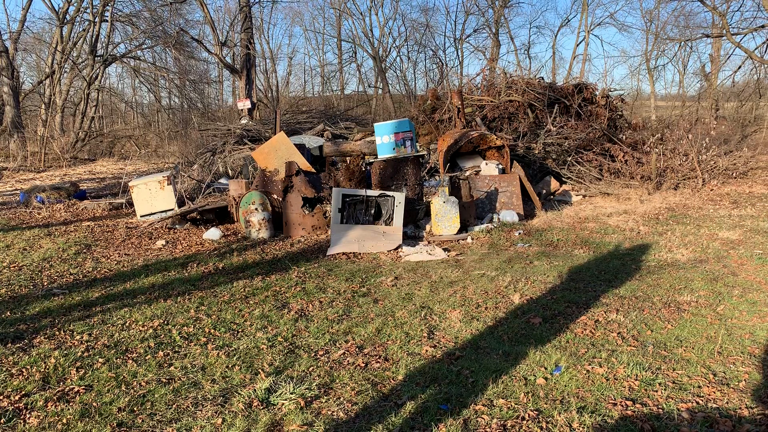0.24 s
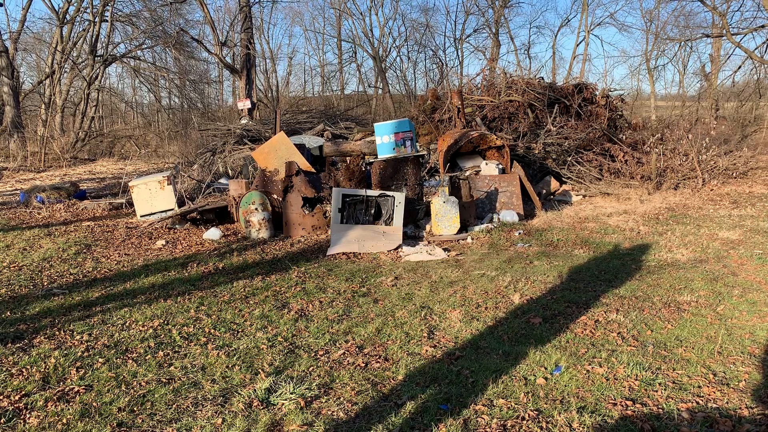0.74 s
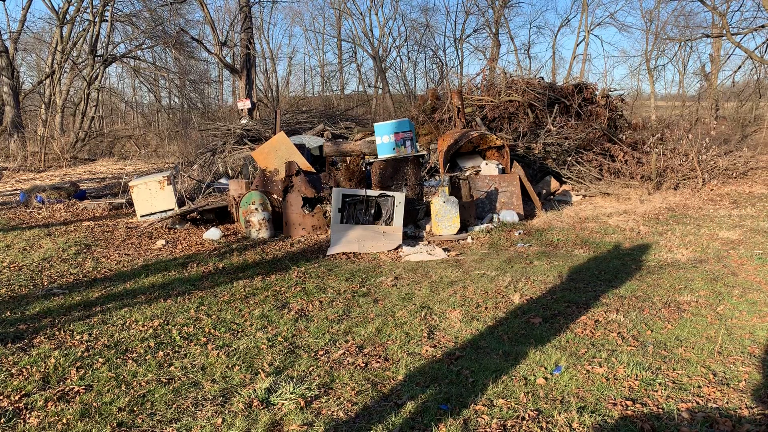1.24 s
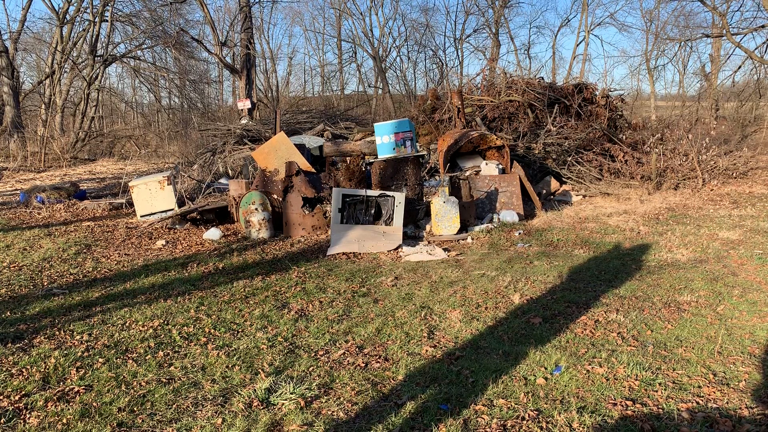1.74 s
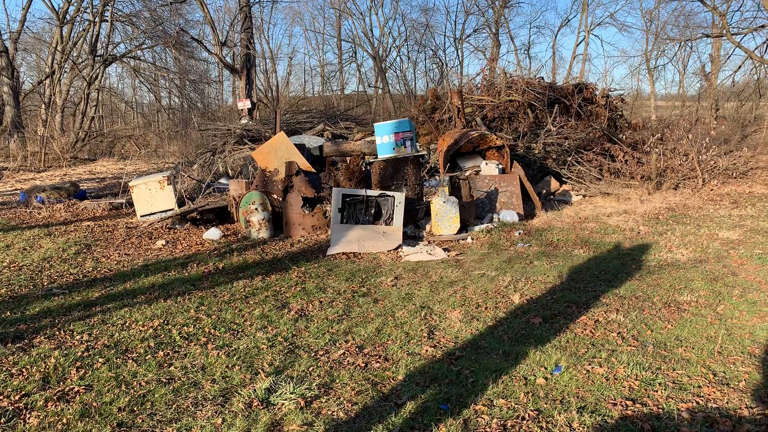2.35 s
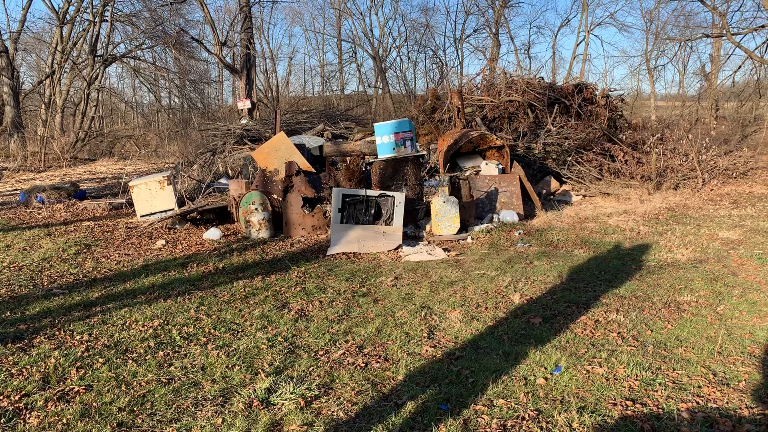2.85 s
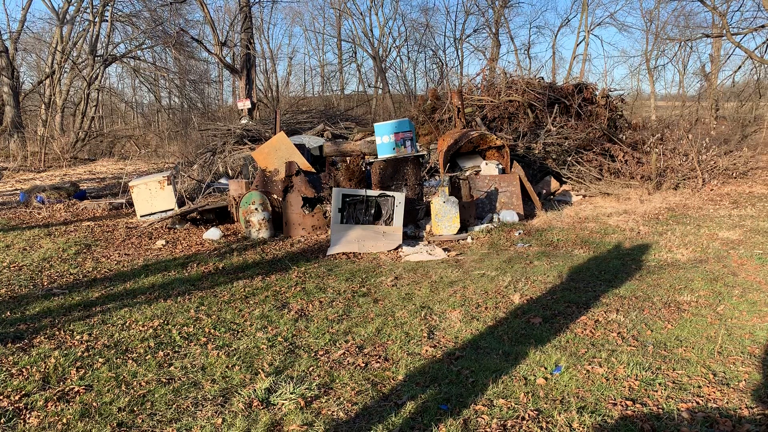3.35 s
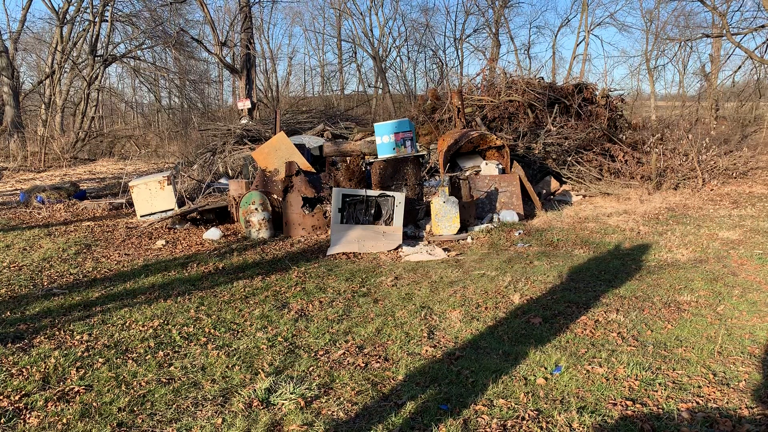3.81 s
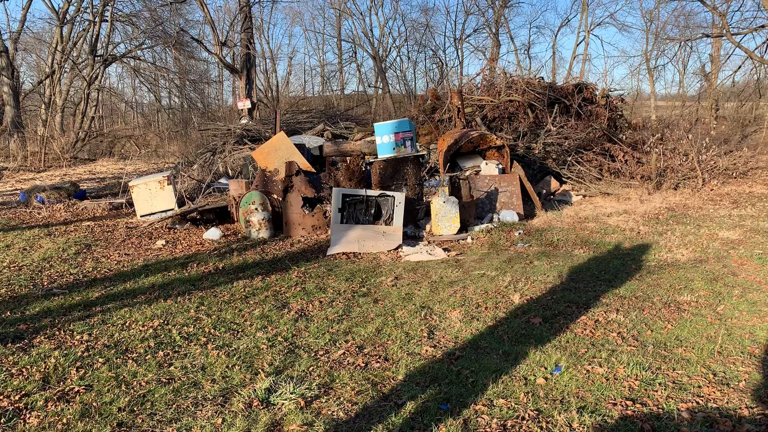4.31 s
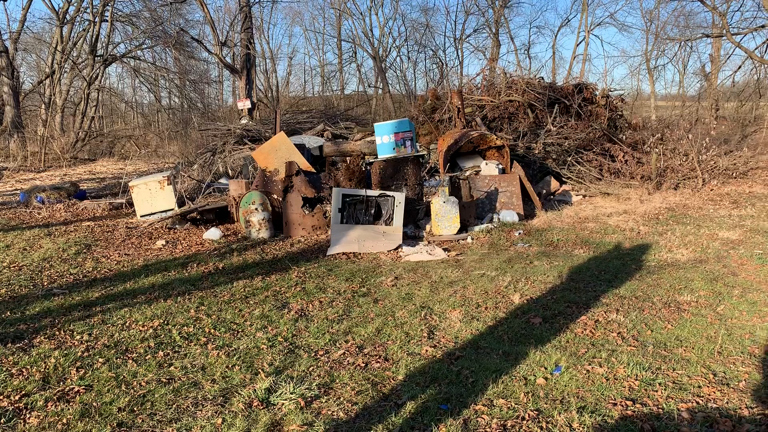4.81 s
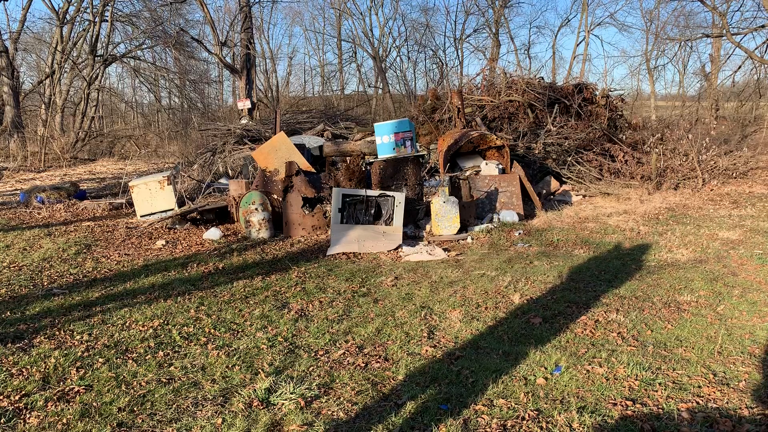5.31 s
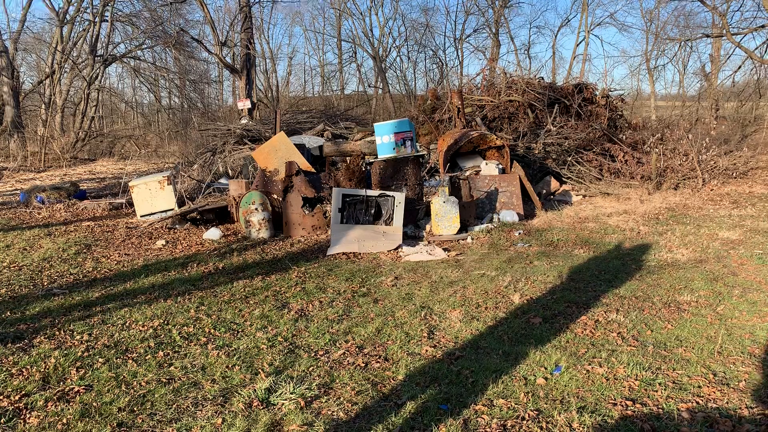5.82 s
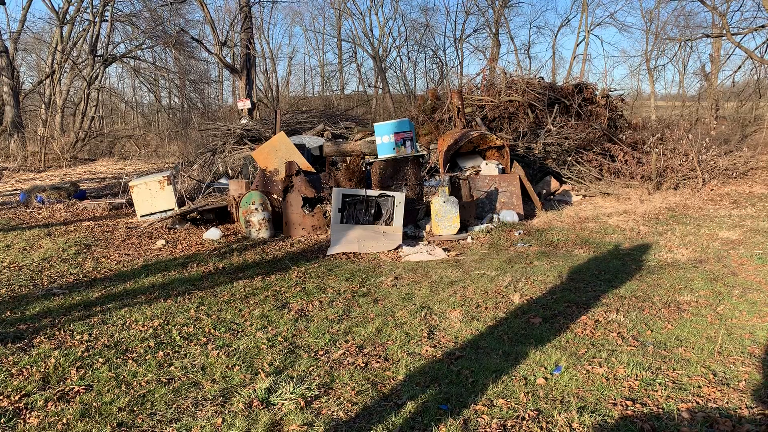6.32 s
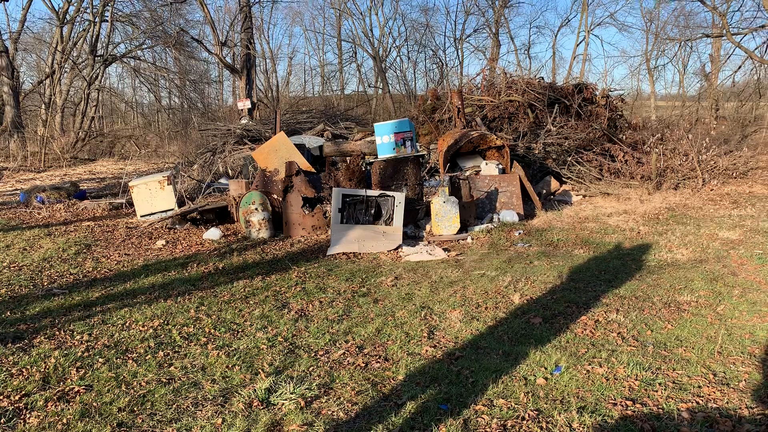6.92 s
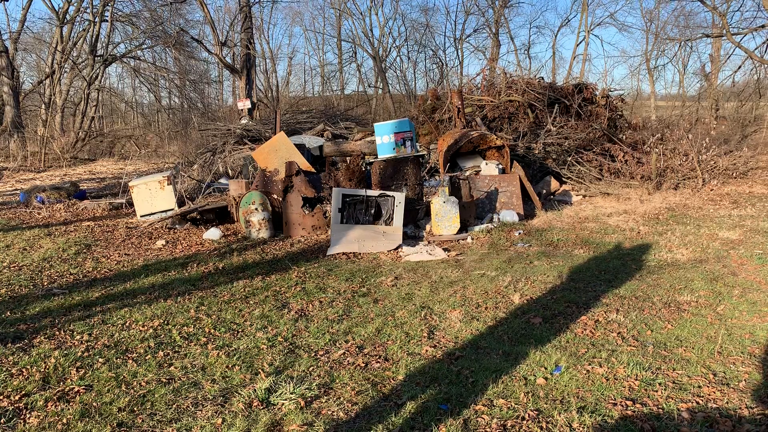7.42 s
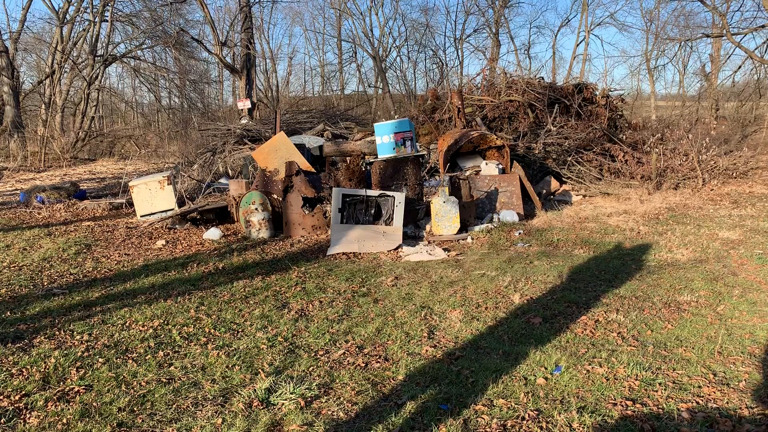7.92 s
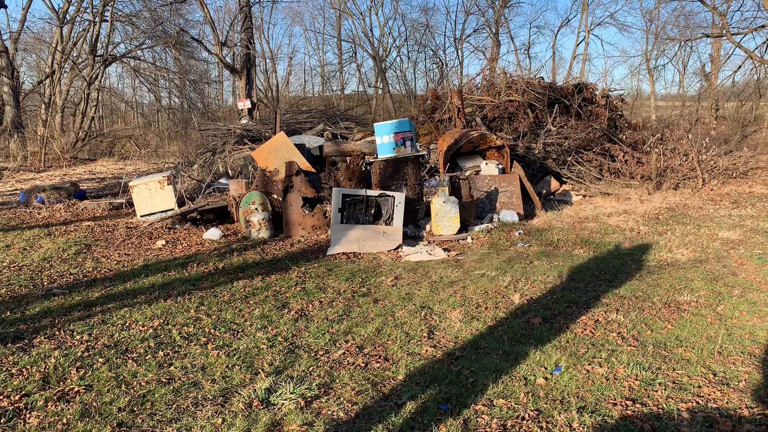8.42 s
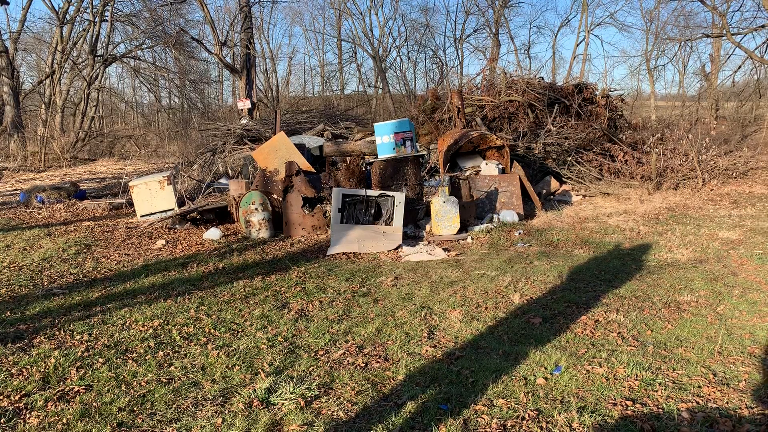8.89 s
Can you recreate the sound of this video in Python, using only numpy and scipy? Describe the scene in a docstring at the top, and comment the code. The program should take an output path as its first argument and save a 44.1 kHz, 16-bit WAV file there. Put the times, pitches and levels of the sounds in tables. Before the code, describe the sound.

The echo of an earlier gunshot dies away as a revolver hammer is cocked. The small revolver then fires three times, a little over two seconds apart, close to the microphone. Each shot is a sharp crack with a short thump, echoing off the trees around an open field. Two light steel clicks follow each shot as the hammer is cocked again. Distant traffic hums faintly, dropping in level after the first shot.

```python
"""A small revolver fires three times on a field, facing a junk pile and bare trees; an earlier shot
is still dying away. Each shot is a crack and a falling thump, answered by the same echoes and the
wash of the woods. After each shot the hammer is cocked with two steel clicks. Distant traffic hums.
The automatic gain drops at the first of the three shots and only creeps back."""
import sys
import numpy as np
from scipy import signal
from scipy.fft import rfft, irfft, next_fast_len
from scipy.io import wavfile

SR = 44100
rng = np.random.default_rng(int(sys.argv[2]) if len(sys.argv) > 2 else 0)


def put_to_file(sound):
    """Save the sound as 16-bit audio at rate SR, in the file named by the first command-line argument."""
    columns = np.atleast_2d(sound).T  # one column per channel
    safe = np.clip(columns, -1, 1)
    whole_steps = np.round(safe * 32767)
    wavfile.write(sys.argv[1], SR, whole_steps.astype(np.int16))


N = 403515
T = np.arange(2 * SR) / SR   # time since onset [s]
BAND_HZ = 28 * 2 ** (np.arange(19) / 2)   # half octaves
CUTOFF_HZ = 16400
LAG_CYCLES = np.array([[.13], [0]])   # the pressure wave reaches the right microphone first


# (time [s], direct level [dB], near scatter [dB], swell length [s])
SHOT_EVENTS = [(-0.458, 1, 0, .016), (3.1214, -2, -2.5, 0.012), (5.503, -0.5, 3.5, 0.048),
               (7.8209, 0.5, 1.5, 0.023)]
# scatter close to the gun: (frequency [Hz], half-octave level [dB])
NEAR_SPECTRUM = [(30, -48), (70, -45), (170, -46), (350, -48.5), (700, -39), (1500, -38.5), (2700, -42),
                 (4000, -42.5), (6000, -41.5), (11000, -39), (14000, -49.5), (16500, -64.5)]

def shots(near_t60_s=0.4):
    """Gun and microphone stay put, so every shot gets the same echoes."""
    out = np.zeros((2, N))
    near = junk_pile() + wash(NEAR_SPECTRUM) * decay(near_t60_s)
    far = reflections() + woods()
    body = bark() + from_db(-1.67) * thump()
    for time_s, direct_db, near_db, swell_s in SHOT_EVENTS:
        add(out, time_s, from_db(direct_db) * (crack() + body) + from_db(near_db) * near + far)
        lead_in = swell(swell_s)
        add(out, time_s - lead_in.shape[1] / SR, lead_in)
    return out


# shock front and its spray: (frequency [Hz], half-octave level [dB])
FRONT_SPECTRUM = [(100, -31), (350, -10.5), (700, -14.5), (1500, -17), (2700, -20.5), (3700, -26),
                  (6000, -25), (10500, -15.5), (14000, -23), (16500, -37.5)]
SPRAY_SPECTRUM = [(100, -40), (350, -31), (700, -27.5), (1500, -22.5), (2700, -23), (3800, -29),
                  (6000, -25), (10500, -24.5), (14000, -28), (16500, -41.5)]

def crack(front_t60_s=0.036, spray_t60_s=0.07, spray_rise_s=0.0075):
    """The shock front, then its spray off the shooter and the ground."""
    front = wash(FRONT_SPECTRUM) * decay(front_t60_s)
    spray = wash(SPRAY_SPECTRUM) * decay(spray_t60_s) * (1 - np.exp(-T / spray_rise_s))
    return front + spray


def thump(rise_s=0.0037, decay_s=0.016, start_hz=500, sweep_s=.003):
    """The pressure wave: low frequencies arrive last, so the swing slows as it dies."""
    cycles = start_hz * sweep_s * np.log1p(T / sweep_s) - LAG_CYCLES
    attack = 1 - np.exp(-(T / rise_s) ** 3)
    return 0.87 * attack * np.exp(-T / decay_s) * np.sin(2 * np.pi * cycles)


# ring of the blast: (frequency [Hz], level [dB], t60 [s])
BARK_MODES = [(335, -16, 0.043), (505, -17, 0.033), (44.5, -42.5, 0.94)]

def bark(delay_s=0.0042):
    """A hollow ring and a faint deep boom, set off by the pressure wave."""
    t = np.maximum(T - delay_s, 0)
    return sum(from_db(db - 60 * t / t60_s) * np.sin(2 * np.pi * np.maximum(hz * t - LAG_CYCLES, 0))
               for hz, db, t60_s in BARK_MODES)


# lead-in to the crack: (frequency [Hz], half-octave level [dB])
SWELL_SPECTRUM = [(60, -30.5), (150, -28), (250, -33.5), (450, -27), (800, -29.5), (1800, -26),
                  (3000, -23.5), (4000, -30.5), (6000, -24), (8000, -33.5), (10000, -50.5), (16500, -62.5)]

def swell(length_s, unity_length_s=0.039, t60_s=0.039, left_db=-9):
    """Noise swells into the crack, mostly on the right; a shorter swell peaks higher."""
    burst = wash(SWELL_SPECTRUM) * decay(t60_s) * np.exp(-(T / length_s) ** 4)
    rising = burst[:, :SR // 40][:, ::-1]
    return unity_length_s / length_s * from_db([[left_db], [0]]) * rising


def junk_pile(delay_s=.0388, thump_delay_s=.0285, thump_db=-21):
    """The pile returns a bright tick inside a duller clatter, and a little of the thump."""
    out = roll(delay_s, width_s=.008, level_db=-24.5, hz=1200, octaves=1.4)
    add(out, delay_s, echo(level_db=-18.5, hz=8990, decay_s=.0012))
    add(out, thump_delay_s, from_db(thump_db) * thump())
    return out


# large reflectors: (delay [s], level [dB], centre [Hz])
REFLECTORS = [(0.086, -30.5, 2400), (.163, -29, 1980), (.182, -20.5, 875), (.367, -31.5, 1200),
              (0.51, -36.5, 1590), (.554, -40, 1060), (.741, -39, 860)]

def reflections(tree_lines=3, trunks=14, first_trunk_s=.13, last_trunk_s=0.56):
    """Tree lines roll, large reflectors knock, and trunks answer weaker and duller with distance."""
    out = sum(roll(0.2434 + line * 0.2256, width_s=0.046, level_db=-49 - 5.5 * line, hz=725, octaves=0.83)
              for line in range(tree_lines))
    for delay_s, level_db, hz in REFLECTORS:
        add(out, delay_s, echo(level_db, hz, decay_s=0.0026))
    places = (np.arange(trunks) + rng.random(trunks)) / trunks
    for delay_s in first_trunk_s + places * (last_trunk_s - first_trunk_s):
        add(out, delay_s, echo(level_db=-35 - 23 * delay_s, hz=2310 / 4 ** delay_s, decay_s=0.0025))
    return out


def echo(level_db, hz, decay_s):
    """A short burst from one reflector; its front rises in one cycle."""
    t = T[:SR // 16]
    burst = noise(bell(hz, octaves=0.42), len(t))
    return from_db(level_db) * burst * np.exp(-t / decay_s) * (1 - np.exp(-t * hz))


def roll(delay_s, width_s, level_db, hz, octaves):
    """The return from a deep, ragged obstacle swells and fades around its delay."""
    return from_db(level_db) * noise(bell(hz, octaves), len(T)) * np.exp(-((T - delay_s) / width_s) ** 2)


# wash of the woods: (frequency [Hz], half-octave level [dB])
WOODS_SPECTRUM = [(35, -54.5), (100, -62), (220, -59.5), (400, -54), (800, -46.5), (1500, -44),
                  (2500, -45.5), (3500, -47), (5500, -46), (10500, -44), (14000, -52.5), (16500, -74)]
# its decay: (frequency [Hz], t60 [s])
WOODS_DECAY = [(60, 1.2), (400, 1.8), (900, 2), (1800, 1.585), (3000, 1.2), (4000, .95), (6000, .8),
               (10000, 0.65), (16000, 0.6)]

def woods(rise_s=0.1, band_flicker_db=3.0, shared_flicker_db=1.5):
    """Countless trunks scatter the shot back; the air takes the treble first."""
    out = 0
    shared_db = shared_flicker_db * drift(rate_hz=200)
    for hz in BAND_HZ:
        level_db = at_hz(WOODS_SPECTRUM, hz) + shared_db + band_flicker_db * drift(rate_hz=90)
        band = noise(bell(hz, octaves=0.36), len(T))
        out += band * from_db(level_db) * decay(at_hz(WOODS_DECAY, hz))
    return out * (1 - np.exp(-(T / rise_s) ** 2))


# hammer: (half cock [s], full cock [s], level [dB], relative ring [dB], treble tilt [dB])
HAMMER_COCKINGS = [(.3457, 0.39, -49.5, -20, 7), (3.8147, 3.8738, -44.5, -9, -2),
                   (6.1055, 6.1595, -46.5, -9, 3), (8.4485, 8.5047, -42, -16, -3.5)]
# handling: (time [s], level [dB], treble tilt [dB], relative scatter [dB])
HANDLING_TICKS = [(.5582, -81, 11, -23), (1.7012, -66, 2, -12), (8.6502, -46.5, -30, -28)]

def gun_action(rattle_delay_s=(0.14, .22)):
    """Each cocking is two clicks and a faint rattle of the loose cylinder; the handled gun ticks."""
    out = np.zeros((2, N))
    for half_s, full_s, level_db, ring_db, tilt_db in HAMMER_COCKINGS:
        add(out, half_s, click(level_db - 6, ring_db, tilt_db))
        add(out, full_s, click(level_db, ring_db, tilt_db))
        for delay_s in rng.uniform(*rattle_delay_s, size=2):
            add(out, full_s + delay_s, click(level_db - 37, ring_db=-5))
    for time_s, level_db, tilt_db, scatter_db in HANDLING_TICKS:
        add(out, time_s, snap(level_db, tilt_db, scatter_db))
    return out


# ring of the gun's steel: (frequency [Hz], relative level [dB], t60 [s])
STEEL_MODES = [(7391, -18.5, .08), (9330, -5.5, .1), (9800, 2, .06), (10050, 3.5, .07), (10700, -10, .08),
               (13800, -17, .07)]

def click(level_db, ring_db, tilt_db=0):
    """Steel meets steel: a snap and a short ring."""
    t = T[:SR // 4]
    ring = sum(from_db(db - 60 * t / t60_s) * np.sin(2 * np.pi * (hz * t + rng.random((2, 1))))
               for hz, db, t60_s in STEEL_MODES)
    return snap(level_db, tilt_db)[:, :len(t)] + from_db(level_db + ring_db) * ring


# contact noise: (frequency [Hz], relative half-octave level [dB])
SNAP_SPECTRUM = [(100, -38), (1400, -14), (2700, -8.5), (5000, -10.5), (7500, -4.5), (10500, 3),
                 (14000, -5), (17000, -15)]

def snap(level_db, tilt_db, scatter_db=-25, t60_s=0.014, scatter_t60_s=0.2):
    """A dry tick on the gun and its faint scatter from the surroundings."""
    tilted = [(hz, db + tilt_db * hz / CUTOFF_HZ) for hz, db in SNAP_SPECTRUM]
    return from_db(level_db) * wash(tilted) * (decay(t60_s) + from_db(scatter_db) * decay(scatter_t60_s))


# traffic and air: (frequency [Hz], relative density [dB])
ROAD_SPECTRUM = [(15, -42.5), (25, -14.5), (76, 0), (134, -11), (229, -14), (317, -29), (427, -19.5),
                 (545, -25), (659, -17), (988, -15), (1330, -22), (1740, -22), (4250, -57), (10700, -59.5),
                 (16000, -71)]
# swells of the tyre note: (time [s], level [dB])
TYRE_PEAKS = [(2.4, -84), (4.9, -79.5), (7.15, -83)]

def traffic(peak_s=2.6, fade_db_per_s=.5, tyre_hz=474, tyre_width_hz=9, swell_s=0.13, left_db=-1.3):
    """A far road: the rush peaks and recedes while a faint tyre note comes and goes."""
    t = np.arange(N) / SR
    rush = noise(lambda hz: from_db(at_hz(ROAD_SPECTRUM, hz)), N)
    rush_gain = from_db(-64 - fade_db_per_s * np.abs(t - peak_s))
    tyres = noise(lambda hz: 1 / (1 + ((hz - tyre_hz) / tyre_width_hz) ** 2), N)
    swells = sum(from_db(db) * np.exp(-((t - time_s) / swell_s) ** 2) for time_s, db in TYRE_PEAKS)
    tyre_gain = from_db(-87.5) + swells
    return (rush * rush_gain + tyres * tyre_gain) * from_db([[left_db], [0]])


# stereo image of all noise: (frequency [Hz], left-right correlation [-1..1])
CORRELATION = [(60, 0.7), (130, 0.42), (290, 0.51), (640, -0.3), (1300, -0.52), (2400, 0.41), (7000, -0.37),
               (15000, 0.4)]

def noise(gain_at, size):
    """Stereo noise of a given colour, rms 1."""
    fft_size = next_fast_len(size)
    hz = np.maximum(np.fft.rfftfreq(fft_size, 1 / SR), 1)
    mid, side = rfft(rng.standard_normal((2, fft_size)))
    correlation = np.clip(at_hz(CORRELATION, hz), -1, 1)
    pair = np.sqrt(1 + correlation) * mid + np.sqrt(1 - correlation) * side * [[1], [-1]]
    x = irfft(pair * gain_at(hz), fft_size)[:, :size]
    return x / np.sqrt(np.mean(x ** 2) + 1e-20)


def wash(spectrum):
    """Steady noise with the given half-octave levels."""
    rms = np.linalg.norm(from_db(at_hz(spectrum, BAND_HZ)))
    return rms * noise(
        lambda hz: from_db(at_hz(spectrum, hz)) * np.sqrt(hz) / np.hypot(hz, BAND_HZ[0]), len(T))


def bell(centre_hz, octaves):
    """Gaussian gain curve over log frequency."""
    return lambda hz: np.exp(-(np.log2(hz / centre_hz) / octaves) ** 2)


def drift(rate_hz):
    """Random wander, spread about 1."""
    return np.interp(T * rate_hz, np.arange(4096), rng.standard_normal(4096))


def decay(t60_s):
    return np.exp(-np.log(1000) * np.minimum(T / t60_s, 10))


def from_db(db):
    return 10 ** (np.asarray(db) / 20)


def at_hz(points, hz):
    knots_hz, values = np.transpose(points)
    return np.interp(np.log(hz), np.log(knots_hz), values)


def add(out, time_s, sound):
    """Mix a stereo sound in; time_s may be negative."""
    at = round(time_s * SR)
    part = sound[:, max(-at, 0):out.shape[1] - at]
    out[:, max(at, 0):max(at, 0) + part.shape[1]] += part


def scene():
    return shots() + gun_action() + traffic()


def microphone(x, dip_hz=11850, width_hz=1200, dip_db=-11):
    """The microphone port dulls one treble band."""
    notched = signal.lfilter(*signal.iirnotch(dip_hz, dip_hz / width_hz, fs=SR), x)
    return notched + from_db(dip_db) * (x - notched)


def gain_control(x, boost_db=14, threshold_db=-24, attack_s=0.0014, release_db_per_s=0.66):
    """Quiet sound is boosted until a loud one comes; the gain then creeps back."""
    over_db = 20 * np.log10(np.abs(x).max(axis=0) + 1e-9) - threshold_db
    creep_db = release_db_per_s * np.arange(N) / SR
    cut_db = np.maximum.accumulate(np.clip(over_db, 0, boost_db) + creep_db) - creep_db
    pole = np.exp(-1 / (attack_s * SR))
    return x * from_db(boost_db - signal.lfilter([1 - pole], [1, -pole], cut_db))


def record(dry):
    """Microphone colour, gain control, soft clipping, steep low-pass."""
    ceiling = 0.76
    clipped = ceiling * np.tanh(gain_control(microphone(dry)) / ceiling)
    return signal.sosfilt(signal.cheby2(16, 70, CUTOFF_HZ + 800, fs=SR, output="sos"), clipped)


dry = scene()
out = record(dry)
put_to_file(out)
```